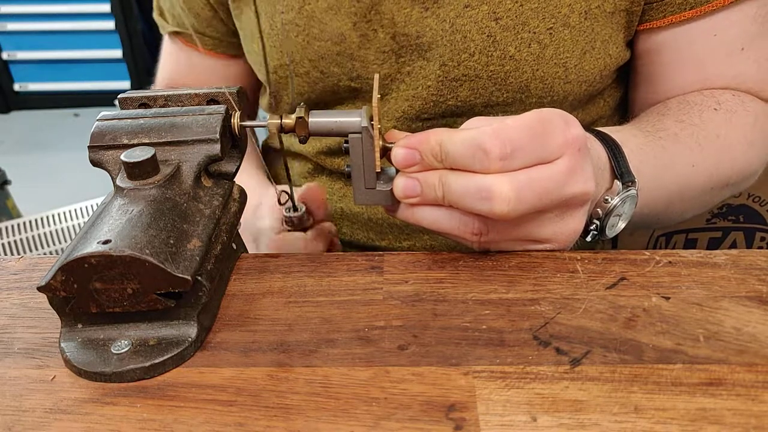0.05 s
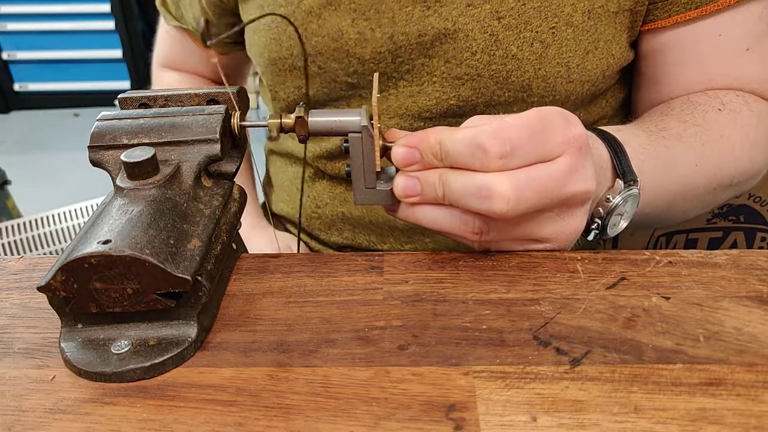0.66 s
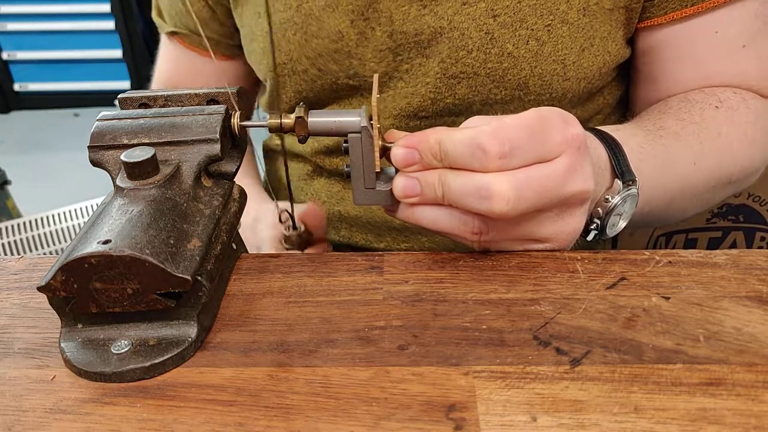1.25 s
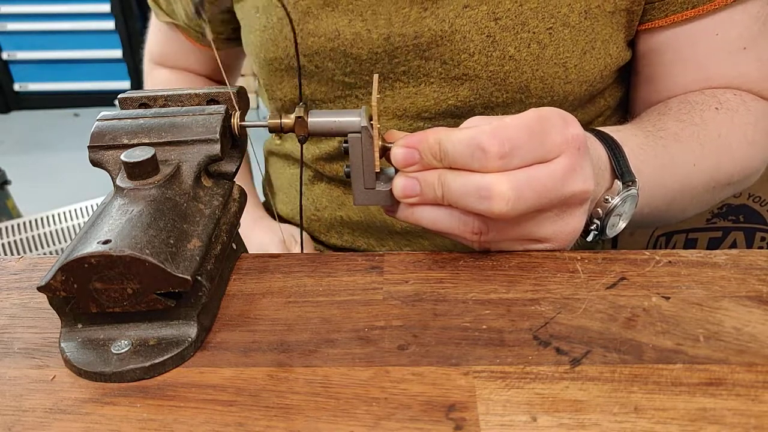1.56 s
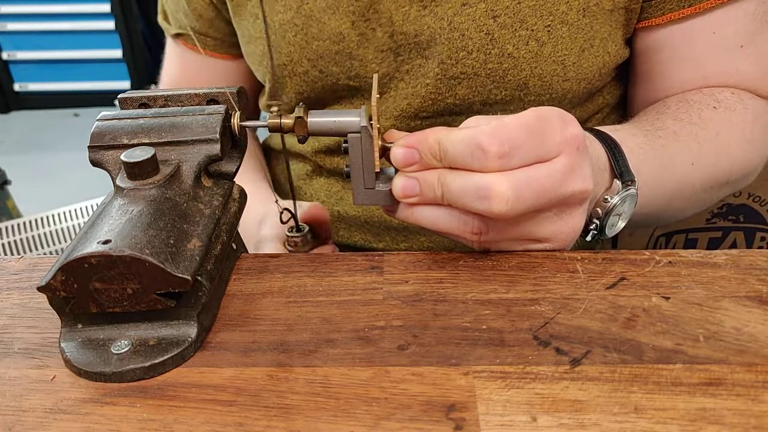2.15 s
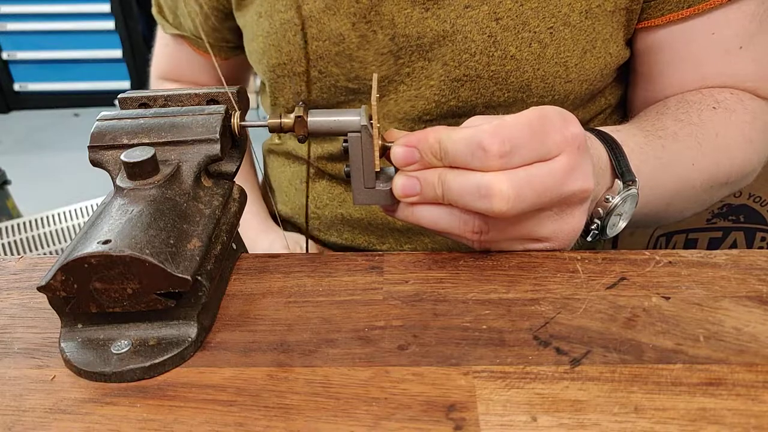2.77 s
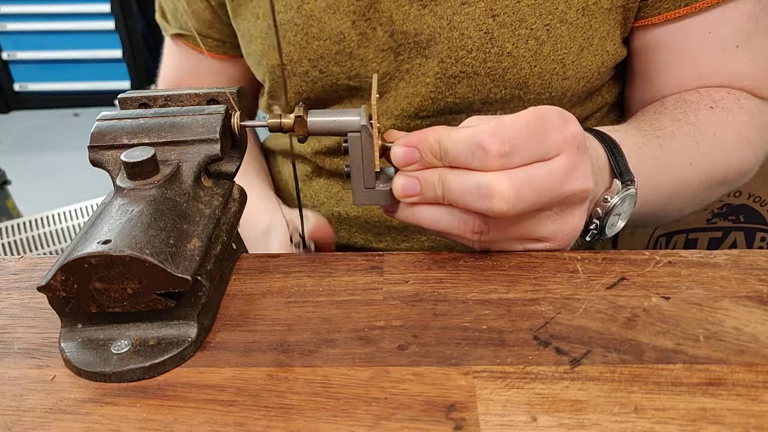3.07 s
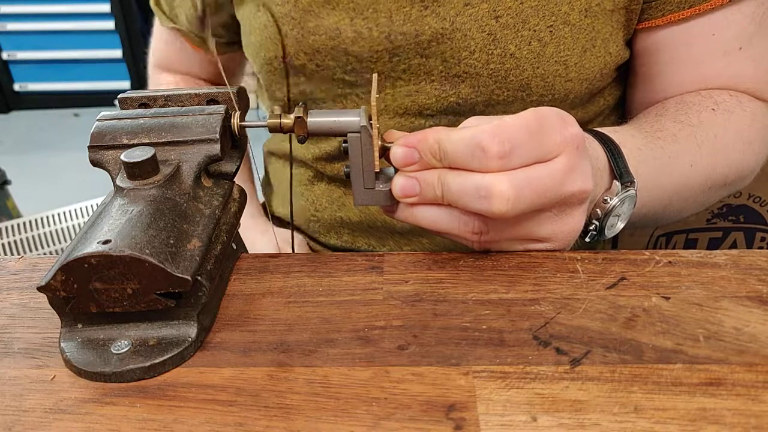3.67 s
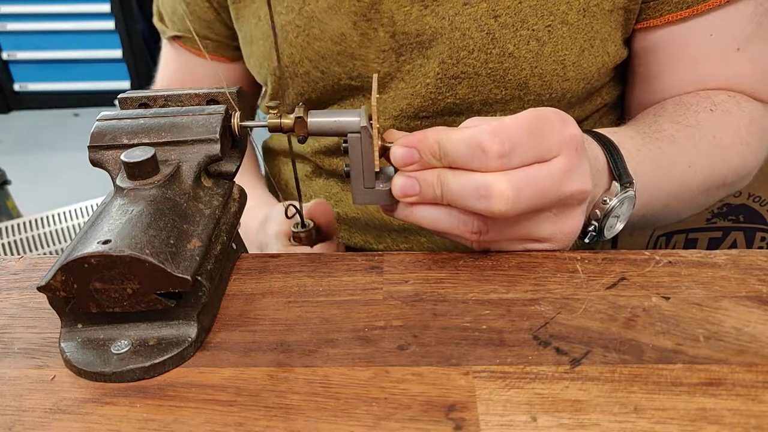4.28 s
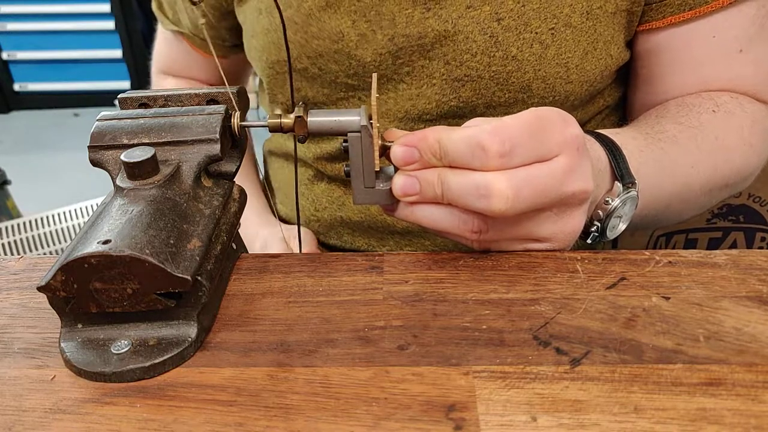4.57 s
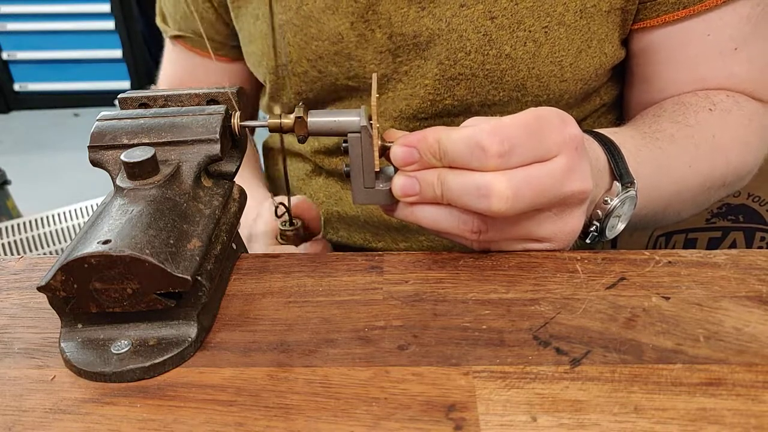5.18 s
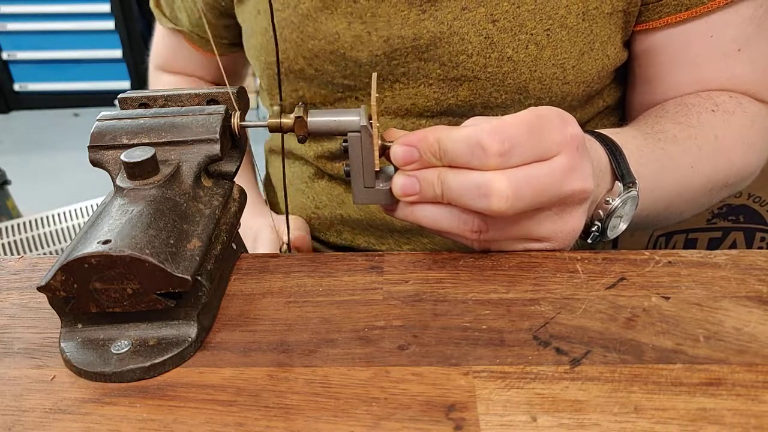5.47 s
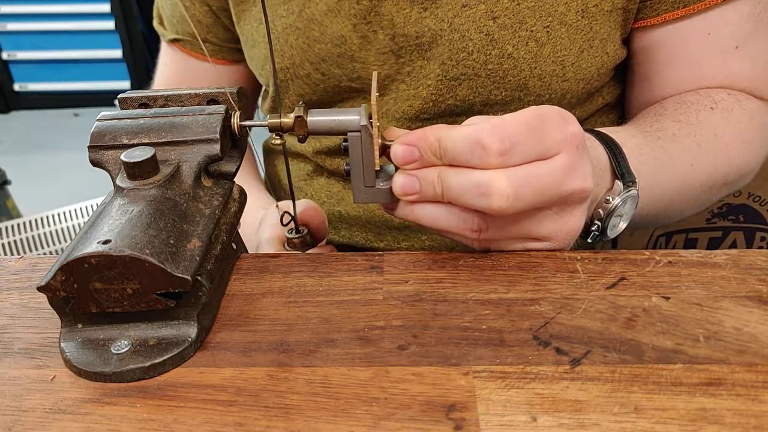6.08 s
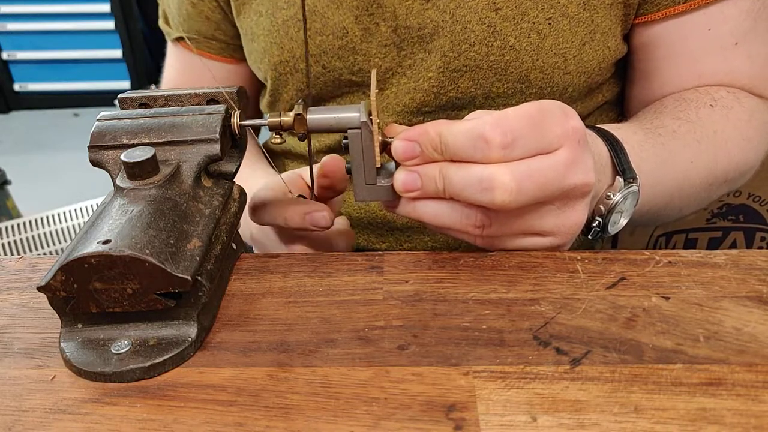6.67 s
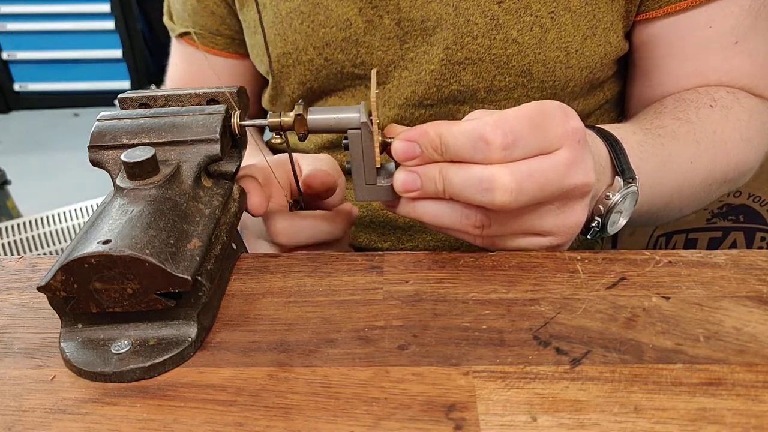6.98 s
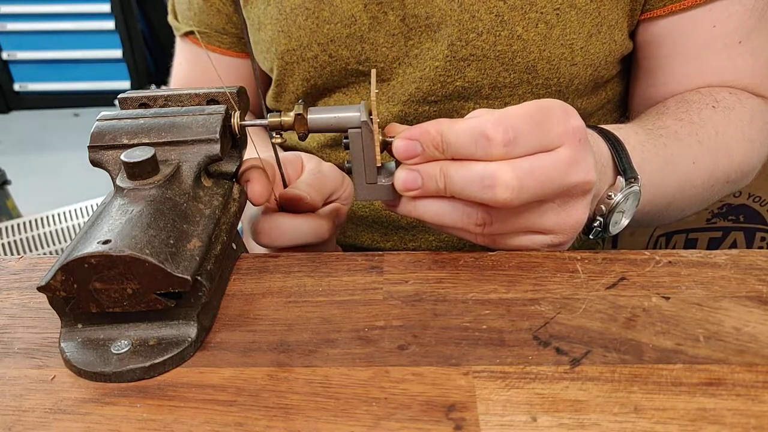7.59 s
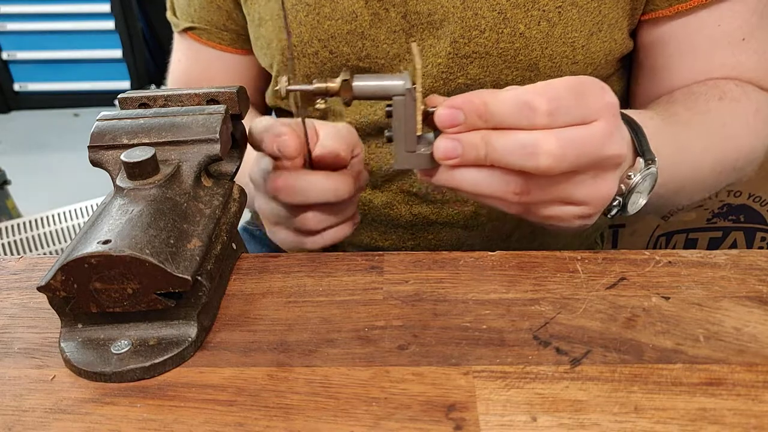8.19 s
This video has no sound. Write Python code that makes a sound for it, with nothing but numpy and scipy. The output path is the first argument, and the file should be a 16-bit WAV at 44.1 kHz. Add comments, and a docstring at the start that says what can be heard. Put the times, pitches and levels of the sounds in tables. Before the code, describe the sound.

A small bow drill bores into a brass plate, close up, in quick back-and-forth rasps with snapping chips and a low judder through a vice and wooden bench. The strokes grow lighter and the brass gives short, high squeaks. The drilling stops, leaving a quiet workshop with a low hum, a faint clock ticking across the room and a few soft knocks as the tool is lifted away.

```python
"""Bow drill on brass, close up

At a wooden workshop bench, a bow spins a small drill back and forth against a brass plate, its far end
pivoted in a vice. On every stroke the cutter judders through vice and bench, rasps and snaps off chips;
now and then the brass squeaks. When the bow stops, a clock is heard across the room over a faint hum,
and the tool is lifted away with a few soft knocks."""
import sys
import numpy as np
from scipy import signal
from scipy.fft import rfft, irfft
from scipy.io import wavfile
from scipy.ndimage import uniform_filter1d

SR = 44100
rng = np.random.default_rng(int(sys.argv[2]) if len(sys.argv) > 2 else 0)


def generate_wav(sig):
    """Save sig (samples, or channels by samples) to the path in sys.argv[1] as 16-bit PCM at SR."""
    pcm = np.round(np.clip(np.atleast_2d(sig).T, -1, 1) * 32767).astype(np.int16)
    wavfile.write(sys.argv[1], SR, pcm)


N = 367774
TIME = np.arange(N) / SR

# Workshop air. Each row: frequency in Hz, relative level in dB.
AIR_SPECTRUM = [(25, 1), (48, 2), (70, 2.5), (130, -9.5), (300, -18), (850, -23), (1450, -27), (1900, -28),
                (6000, -27.5), (7500, -31), (10000, -39.5), (15700, -34)]
# Machine hum in the room. Each row: frequency in Hz, level in dB.
HUM_TONES = [(48.4, -54), (75.4, -82.5), (100, -69.5)]
# Clock beats. Each row: time in seconds, relative level in dB, case tone in Hz.
CLOCK_BEATS = [(6.50, -66, 1200), (7.101, -61, 1620), (7.68, -65, 1170), (8.277, -61.5, 1630)]
# Fingers change grip. Each row: time in seconds, level in dB, half-width in seconds.
FINGER_RUBS = [(6.15, -66.5, 0.18), (6.75, -71.5, 0.3)]
# The tool bumps the vice, in the last strokes and as it is freed. Each row: time in seconds,
# relative bump level in dB, bench thud in dB, thud pitch in Hz, steel clink in dB.
TOOL_KNOCKS = [(4.173, -43.5, -29.5, 183, -52), (4.84, -39, -55, 181, -47), (5.493, -36, -54, 182.4, -33),
               (6.872, -46, -49, 70, -62), (7.015, -53, -49, 171, -58), (7.946, -41.5, -36.5, 173, -52)]
# A dull bump. Each row: frequency in Hz, relative level in dB.
BUMP_SPECTRUM = [(70, -18), (170, -9.5), (260, -9), (350, -8), (470, -18), (700, -9.5), (880, -10.5),
                 (1130, -22), (1400, -28), (4000, -82)]
# The pivot leaves its seat. Each row: time in seconds, relative level in dB, half-width in seconds.
PIVOT_SLIDES = [(8.12, -62.5, 0.0087), (8.155, -68, 0.028)]
# The sliding pivot's rub. Each row: frequency in Hz, relative level in dB.
SLIDE_SPECTRUM = [(150, -18), (450, 8), (1500, 5), (3000, -1), (6000, 6.5), (10000, -21)]
# Modes of bench, vice and plate. Each row: frequency in Hz, bandwidth in Hz, relative level in dB,
# left minus right in dB.
BENCH_MODES = [(77, 15.8, -10.5, -5), (105.6, 4.8, 3.5, 4), (150.3, 18.5, 4, 1.5), (185.2, 25.2, 0.5, 4),
               (201.6, 27, -4.5, 3.5), (243.9, 15.3, -9.5, 5)]
VICE_MODES = [(282, 29.5, -3, 8.1), (333.7, 13.3, 3.5, 5.6), (384.4, 26.8, 3.5, 1.2), (452, 74.5, -2, 2.2),
              (536, 26.6, -3.5, 0.84), (629.5, 22, -10, 18.4), (698.6, 13.6, -4, 18),
              (806.3, 32, -1.5, 1.2), (894.7, 26.6, -1.5, 1.9), (1059, 54, -10.5, 6), (1131, 30, -6, 2.7),
              (1310, 200, -12.5, 4.5), (1516, 62, -9, 5.4), (1924, 306, -19.5, 3), (2410, 74, -16, 4.2)]
PLATE_MODES = [(3676, 140, 7, 6), (4540, 290, 2.5, -11), (5440, 47, 7, 7), (6205, 100, 2, 19),
               (8150, 300, -8.5, -12), (8200, 88, 1.5, -16), (9640, 210, -17, -19)]
# How alike a mode is on the microphone's two sides. Each row: frequency in Hz, likeness from -1 to 1.
STEREO_LIKENESS = [(60, 0.86), (200, 1), (330, 1), (500, 0.57), (800, 0.78), (1200, -0.28), (2500, -0.2)]
# The cutter digs in and thumps the bench. Each row: start in seconds, relative level in dB, pitch in Hz.
DEEP_DIGS = [(0.015, -10.5, 143), (0.227, -7.5, 179), (0.282, -6, 154), (0.695, -9.5, 156),
             (1.054, -7.5, 167), (1.232, -7.5, 158), (1.465, -7.5, 142), (1.648, -5, 146),
             (1.719, -1, 159.7), (1.9, -6.5, 123), (2.937, -15, 151), (3.025, -8, 154.4), (3.402, -21, 147),
             (3.608, -10.5, 151), (3.746, -15, 163), (4.028, -10, 168), (5.442, -17, 161),
             (5.829, -12, 150)]
# The spindle rattles in the vice on hard strokes. Each row: time in seconds, level in dB.
SPINDLE_RATTLES = [(1.290, -38), (1.322, -27.5), (1.936, -31), (2.062, -26), (2.104, -33.5)]
# The bow lets off. Each row: time in seconds, relative level of the arbor's ring in dB.
BOW_RELEASES = [(2.512, -55.5), (4.181, -60), (5.98, -63)]
# The free steel arbor's beating pair of modes. Each row: frequency in Hz, relative level in dB.
FREE_ARBOR_MODES = [(5190, 4), (5281, 1)]
# The arbor pressed into the cut. Each row: frequency in Hz, bandwidth in Hz, gain in dB.
PRESSED_ARBOR_MODES = [(3870, 60, -9), (5270, 14, 1)]
# The edge chatters on the brass. Each row: time in seconds, relative level in dB, half-width in seconds,
# first pitch in Hz, last pitch in Hz, ring left in the plate in dB.
BRASS_SQUEAKS = [(3.781, -25, 0.003, 4150, 4290, -21), (3.867, -15.5, 0.0066, 5135, 3900, -24),
                 (4.097, -18, 0.003, 4000, 5330, -28), (4.587, -28, 0.0094, 4150, 4500, -28),
                 (4.659, -23, 0.0058, 3900, 4230, -28), (4.707, -22, 0.0025, 3900, 4820, -30),
                 (4.734, -38, 0.0025, 5600, 5800, -30), (4.768, -23.5, 0.003, 3800, 4020, -29),
                 (5.1, -26.5, 0.0036, 4500, 4730, -40), (5.653, -25.5, 0.011, 6000, 3920, -30),
                 (5.965, -30, 0.0079, 3800, 4250, -27)]
# The colour of that chatter. Each row: frequency in Hz, relative level in dB.
CHATTER_SPECTRUM = [(2000, -37.5), (3300, -18), (3950, -3.5), (4800, -5.5), (5700, -21.5), (7000, 1.5),
                    (8250, -2), (9500, -34), (16000, -35)]
# The edge catches and shrieks. Each row: time in seconds, pitch in Hz, relative level in dB.
EDGE_CATCHES = [(1.074, 5990, -29.5), (2.1382, 6060, -33.5), (3.787, 5760, -28), (5.4283, 5720, -26)]
# Big chips snap off the plate. Each row: time in seconds, relative level in dB, pitch in Hz.
BIG_CHIPS = [(0.0151, -17, 6100), (0.0302, -25, 5700), (0.0499, -33, 5560), (0.2447, -25, 6160),
             (0.2758, -24, 5700), (0.3945, -26.5, 6200), (0.4375, -22, 6200), (0.4766, -21, 5600),
             (0.5109, -21, 5910), (0.6948, -21.5, 5230), (0.8351, -20, 5700), (0.8432, -18.5, 5900),
             (0.8607, -21, 6000), (0.8974, -16.5, 6360), (1.072, -16.5, 5730), (1.2213, -21.5, 5630),
             (1.261, -18, 5640), (1.315, -18.5, 6200), (1.483, -15.5, 4750), (1.5249, -16.5, 6250),
             (1.5523, -17, 5740), (1.6574, -14.5, 6200), (1.6754, -19, 6300), (1.684, -22, 5900),
             (1.709, -15, 5950), (1.7288, -16.5, 6340), (1.8624, -16.5, 5500), (1.888, -15, 6140),
             (1.939, -23, 5660), (2.0515, -26, 5570), (2.0725, -20, 5230), (2.1001, -13, 5710),
             (2.1494, -13, 5950), (2.2538, -26.5, 5900), (2.325, -21, 6100), (2.364, -22.5, 5660),
             (2.4786, -27, 5500), (2.4992, -15, 5270), (2.7188, -25, 5830), (2.802, -18.5, 6100),
             (2.9353, -26, 6200), (2.9722, -19.5, 6100), (3.007, -24, 5500), (3.1036, -25, 5960),
             (3.211, -22, 5750), (3.358, -20.5, 5700), (3.3892, -30, 5850), (3.404, -23, 5530),
             (3.5668, -23, 5200), (4.7239, -18, 6100), (4.7363, -21, 5750), (5.1161, -17.5, 6130),
             (5.132, -23, 5700), (5.5407, -23.5, 5750), (5.5834, -24.5, 5950), (5.6057, -26.5, 5660),
             (5.6443, -20.5, 6470)]
# Thin spits of splinters, high above the rasp. Each row: time in seconds, relative level in dB.
SPLINTER_SPITS = [(0.016, -40), (0.844, -44), (1.074, -44), (1.298, -45), (1.315, -45), (1.865, -46),
                  (3.360, -44), (3.392, -44), (3.426, -46), (3.766, -47), (3.786, -42), (3.866, -39),
                  (3.981, -43), (4.003, -43), (4.077, -43), (4.099, -42), (4.492, -41), (4.961, -39),
                  (5.118, -46), (5.430, -46), (5.610, -50), (5.646, -39)]
# The highest modes, rung by splinters. Each row: frequency in Hz, bandwidth in Hz, relative level in dB.
SIZZLE_MODES = [(11030, 270, -7.5), (12800, 880, -8), (14200, 900, -6), (15600, 500, -1)]
# The scraping edge's colour. Each row: frequency in Hz, relative levels left and right in dB.
EDGE_SPECTRUM = [(510, -60, -70), (2100, -23, -2.5), (2850, -17.5, -4), (3480, -17, -2), (3780, -1.5, 4.5),
                 (4250, -5, -0.5), (5250, -7, 5), (5650, 4.5, -9), (6040, 0.5, 7.5), (6760, -12, -4.5),
                 (8170, -17, 4.5), (9010, -31, -6), (10300, -69, -49), (13200, -44, -45), (15400, -41, -27)]
# Pushes and pulls of the bow. Each row: start and end in seconds, then relative levels in dB of
# bench thrum, vice grind and rasp.
BOW_STROKES = [(0.008, 0.112, -17, -28, -30), (0.184, 0.347, -22.5, -33, -36.5),
               (0.395, 0.524, -19.5, -30.5, -34), (0.616, 0.76, -21.5, -34.5, -38),
               (0.807, 0.915, -19.5, -30, -32), (1.024, 1.155, -21, -33.5, -38.5),
               (1.227, 1.355, -17.5, -27.5, -31.5), (1.437, 1.579, -18, -29.5, -31.5),
               (1.628, 1.759, -19.5, -27.5, -32.5), (1.847, 1.988, -20.5, -28.5, -30),
               (2.046, 2.167, -16.5, -27, -31.5), (2.26, 2.404, -19, -30.5, -33),
               (2.475, 2.503, -16, -30, -36), (2.717, 2.866, -22, -31.5, -34),
               (2.927, 3.033, -17, -29.5, -34), (3.111, 3.272, -22.5, -30.5, -31.5),
               (3.336, 3.466, -21.5, -31, -31), (3.548, 3.685, -23.5, -33.5, -34.5),
               (3.748, 3.89, -24, -35, -33.5), (3.975, 4.113, -28.5, -38, -37),
               (4.17, 4.182, -39, -43.5, -35.5), (4.442, 4.594, -30, -42.5, -40.5),
               (4.678, 4.805, -29.5, -40, -33), (4.908, 5.036, -29, -40, -38.5),
               (5.095, 5.218, -28.5, -35, -36.5), (5.325, 5.471, -29, -39.5, -39),
               (5.53, 5.67, -31.5, -40.5, -42), (5.753, 5.932, -30.5, -41.5, -41)]


def from_db(db):
    """Decibels to gain."""
    return 10 ** (np.asarray(db) / 20)


def unit_power(x):
    """Scale to unit power."""
    return x / np.sqrt(np.mean(x ** 2) + 1e-20)


def pan(db):
    """Gains at the microphone for a level difference, left minus right."""
    return from_db(np.array([[db], [-db]]) / 2)


def drift(per_s):
    """Smooth random wandering with a spread of about 1."""
    knots = rng.standard_normal(2 ** 15)
    return np.interp(TIME * per_s, np.arange(len(knots)), knots)


def steady(x, span_s):
    """Unit power over every short span."""
    power = uniform_filter1d(np.mean(x ** 2, axis=0), max(int(span_s * SR), 2))
    return x / np.sqrt(np.abs(power) + 1e-20)


def colour(x, spectrum, size=8192):
    """Minimum-phase filter of unit power gain that follows a spectrum."""
    hz, db = np.transpose(spectrum)
    grid = np.maximum(np.fft.rfftfreq(size, 1 / SR), 1)
    cepstrum = irfft(np.log(from_db(np.interp(np.log(grid), np.log(hz), db))))
    cepstrum[1:size // 2] *= 2
    cepstrum[size // 2 + 1:] = 0
    response = irfft(np.exp(rfft(cepstrum)))
    return signal.oaconvolve(x, response / np.linalg.norm(response))[:N]


def resonance(x, hz, width):
    """Two-pole resonance with gain 1 at its peak and a width in Hz."""
    r = np.exp(-np.pi * width / SR)
    poles = [1, -2 * r * np.cos(2 * np.pi * hz / SR), r * r]
    return signal.lfilter(np.array([1, 0, -1]) * (1 - r * r) / 2, poles, x + 1e-18)


def body(force, modes):
    """Two forces ring a set of modes; the high modes are less alike left and right than the low."""
    out = np.zeros((2, N))
    for k, (hz, width, db, side_db) in enumerate(modes):
        alike = np.clip(np.interp(hz, *np.transpose(STEREO_LIKENESS)), -1, 1)
        drive = np.sqrt(1 + alike) * force[0] + np.sqrt(1 - alike) * force[1] * [[1], [-1]]
        out += (-1) ** k * from_db(db) * pan(side_db) * resonance(drive, hz, width)
    power_gain = sum(from_db(2 * db) * 2 * np.pi * width / SR for _, width, db, _ in modes)
    return out / np.sqrt(power_gain)


def grains(per_s, spread_db):
    """Two trains of tiny fractures of uneven size."""
    sizes = from_db(spread_db * np.minimum(rng.exponential(1, (2, N)), 4))
    return unit_power(sizes * rng.choice([-1, 1], (2, N)) * (rng.random((2, N)) < per_s / SR))


def fade(clicks, decay_s):
    """Give each click an exponential tail."""
    return signal.lfilter([1], [1, -np.exp(-1 / (decay_s * SR))], clicks + 1e-18)


def blows(rows, crumble, crumble_s):
    """A click and a brief crumbling for each time in seconds and level in dB."""
    clicks = np.zeros(N)
    for s, db in rows:
        clicks[round(s * SR)] = from_db(db)
    return clicks * [[1], [0]] + crumble * fade(clicks, crumble_s) * rng.standard_normal((2, N))


def swells(rows):
    """A bell-shaped envelope for each time in seconds, level in dB and half-width in seconds."""
    out = np.zeros(N)
    for s, db, half in rows:
        near = slice(*np.searchsorted(TIME, [s - 10 * half, s + 10 * half]))
        out[near] += from_db(db) * np.exp(-((TIME[near] - s) / half) ** 2 / 2)
    return out


def struck(rows, rise_s, decay_s):
    """A swelling, dying sine for each start in seconds, level in dB and pitch in Hz."""
    out = np.zeros(N)
    for s, db, hz in rows:
        start = round(s * SR)
        t = TIME[:min(N - start, int(10 * decay_s * SR))]
        envelope = from_db(db) * (1 - np.exp(-t / rise_s)) * np.exp(-t / decay_s)
        out[start:start + len(t)] += envelope * np.sin(2 * np.pi * hz * t)
    return out


def echoes(x, t60, delay_s):
    """Diffuse reflections of unit power gain, different on each side of the microphone."""
    t = TIME[:min(int(t60 * SR), SR)]
    tail = rng.standard_normal((2, SR))[:, :len(t)] * from_db(-60 * t / t60) * (t > delay_s)
    return signal.oaconvolve(x, tail / np.linalg.norm(tail, axis=1, keepdims=True), axes=1)[:, :N]


def room_tone():
    """Quiet workshop air all round the microphone, and a wavering low machine hum."""
    mid, side = rng.standard_normal((2, N))
    side = signal.sosfilt(signal.butter(1, 400, "high", fs=SR, output="sos"), side)
    air = np.array([colour(mid + side, AIR_SPECTRUM), colour(mid - side, AIR_SPECTRUM)])
    hum = 0
    for hz, db in HUM_TONES:
        amplitude = from_db(db + 0.79 * drift(5.8)) * np.sqrt(2)
        hum += amplitude * np.sin(2 * np.pi * hz * TIME + 3.9 * drift(6.0))
    return (from_db(-56.5) * air + hum) * pan(0.92)


def clock():
    """A clock across the room: tick and tock differ in case tone and arrive as reverberation."""
    beats = 0
    for s, db, hz in CLOCK_BEATS:
        escapement = swells([(s + 0.0035, db, .007)]) * rng.standard_normal((2, N))
        click = .5 * resonance(escapement, 4560, 450) - 1.28 * resonance(escapement, 5900, 740)
        beats += 1.66 * resonance(escapement, hz, 120) + click
    return from_db(23.0) * echoes(beats, t60=0.52, delay_s=0.00042)


def grips():
    """Skin rubs softly on the tool."""
    return swells(FINGER_RUBS) * unit_power(resonance(rng.standard_normal((2, N)), 1450, 220))


def handling():
    """The tool bumps the vice, the bench thuds and the pivot slides free, with some room behind them."""
    touches = blows([(s, db) for s, db, *_ in TOOL_KNOCKS], crumble=0.24, crumble_s=0.0089)
    clinks = blows([(s, db) for s, *_, db in TOOL_KNOCKS], crumble=0.32, crumble_s=0.0091)
    bumps = from_db(12.5) * colour(touches[0], BUMP_SPECTRUM) + edge(clinks)
    thuds = struck([(s, db, hz) for s, _, db, hz, _ in TOOL_KNOCKS], rise_s=0.0026, decay_s=0.019)
    friction = swells(PIVOT_SLIDES) * grains(per_s=1100, spread_db=1.0)[0]
    direct = (bumps + thuds + from_db(4.5) * colour(friction, SLIDE_SPECTRUM)) * pan(3.0)
    return direct + from_db(-1.0) * echoes(direct, t60=0.35, delay_s=0.012)


def sway(thrum):
    """The whole bench rumbles for as long as the arm is working, and its top drones on a little."""
    working = np.tanh(from_db(44.0) * thrum)
    rumble = unit_power(resonance(resonance(rng.standard_normal(N), 40, 37), 44, 47))
    drone = unit_power(resonance(working * rng.standard_normal(N), 98.7, 8.4))
    return (from_db(-45.0) * working * rumble + from_db(-43.5) * drone) * pan(1.7)


def thumps():
    """A deep dig swings the bench for a few firm cycles."""
    return from_db(-3.5) * struck(DEEP_DIGS, rise_s=0.0041, decay_s=0.018) * pan(3.7)


def rattles(half_s=0.0054, above_hz=650):
    """A burst of loose contacts rings the upper modes of the vice."""
    shaking = swells([(s, db, half_s) for s, db in SPINDLE_RATTLES]) * rng.standard_normal((2, N))
    return body(shaking, [mode for mode in VICE_MODES if mode[0] > above_hz])


def judder(bite, thrum, grind, snaps, top_hz=4700):
    """The uneven bite and each snapping chip shake the heavy vice and the bench, which pass few highs."""
    force = grains(per_s=900, spread_db=1.5) * from_db(2.0 * bite)
    jolts = blows(snaps, crumble=0.0068, crumble_s=0.0052)
    bench = steady(body(force + from_db(40.0) * jolts, BENCH_MODES), span_s=0.0325)
    bench *= from_db(-4.0 + 2.23 * drift(35)) * thrum
    vice = steady(body(force + from_db(38.5) * jolts, VICE_MODES), span_s=0.033)
    vice *= from_db(-1.03 + 1.22 * drift(45)) * grind
    bench, vice = signal.sosfilt(signal.butter(2, top_hz, fs=SR, output="sos"), [bench, vice])
    vice_room = from_db(-8.0) * echoes(vice, t60=0.56, delay_s=0.011)
    bench_room = from_db(-19.5) * echoes(bench, t60=0.41, delay_s=0.017)
    return bench + vice + vice_room + bench_room


def free_ring():
    """With the bow's pressure off, the steel arbor sings on."""
    rows = [(s, db + mode_db, hz) for s, db in BOW_RELEASES for hz, mode_db in FREE_ARBOR_MODES]
    return struck(rows, rise_s=.01, decay_s=0.085) * pan(13)


def singing(hz=8240, lead_s=.003):
    """Each squeak leaves a clear note in a high mode of the plate, right of the microphone."""
    rows = [(s - lead_s, ring_db, hz) for s, *_, ring_db in BRASS_SQUEAKS]
    return struck(rows, rise_s=0.0037, decay_s=0.0059) * pan(-19.5)


def catches():
    """A caught edge swings up and dies within a couple of milliseconds, as one clear note on the left."""
    shrieks = sum(swells([(s, db, .0006)]) * np.sin(2 * np.pi * hz * TIME) for s, hz, db in EDGE_CATCHES)
    return from_db(9.0) * shrieks * pan(22.2)


def squeal():
    """Rough stick-slip whose pitch glides through each squeak."""
    glide = []
    for s, _, half, first_hz, last_hz, _ in BRASS_SQUEAKS:
        glide += [(s - half, first_hz), (s + half, last_hz)]
    hz = np.interp(TIME, *np.transpose(sorted(glide)))
    phase = 2 * np.pi * np.cumsum(hz * (1 + 0.07 * drift(1500))) / SR
    return from_db(-6.5) * np.sin(phase) * [[1], [0]] + from_db(-8) * rng.standard_normal((2, N))


def sizzle(splinters):
    """The finest splinters favour now one high mode, now another."""
    modes = 0
    for hz, width, db in SIZZLE_MODES:
        modes += from_db(db + 5.7 * drift(60)) * resonance(resonance(splinters, hz, width), hz, width)
    return from_db(10) * modes * pan(-11.5)


def nicks(rasp, per_s=60, spread_db=2, centre_hz=5200, spread_octaves=.17):
    """The edge skips on the brass in tiny ticks, each at its own pitch, that coarsen the rasp."""
    at = np.flatnonzero(rng.random(N) < per_s / SR)
    size, pitch = np.clip(rng.standard_normal((len(at), 2)), -2, 2).T
    db = 20 * np.log10(rasp[at] + 1e-9) + 6.5 + spread_db * size
    hz = centre_hz * 2 ** (spread_octaves * pitch)
    return struck(zip(TIME[at], db, hz), rise_s=.0001, decay_s=.0007) * pan(10)


def pings():
    """Each big chip rings the edge briefly at a pitch of its own."""
    return from_db(-7) * struck(BIG_CHIPS, rise_s=0.0002, decay_s=0.0021) * pan(14)


def chipping(rasp, flakes_per_s=50, spread_db=7):
    """Times and levels of the big chips, and of random flakes, stronger the harder the edge cuts."""
    at = np.flatnonzero((rng.random(N) < flakes_per_s / SR) & (rasp > 0))
    flake_db = 20 * np.log10(rasp[at]) + 2.5 - spread_db * rng.standard_normal(N)[at]
    return [(s, db) for s, db, _ in BIG_CHIPS] + list(zip(TIME[at], flake_db))


def bowing(levels_db, lead_s, lag_s, bite_s, coast_s, arch, idle_db, idle_s):
    """Gain of the strokes: each bites, arches with the bow's speed, coasts and leaves a dying rub."""
    power = np.zeros(N)
    for (start, end, *_), db in zip(BOW_STROKES, levels_db):
        length = end - start + lead_s + lag_s
        span = slice(*np.searchsorted(TIME, [start - lead_s, end + 1]))
        t = TIME[span] - (start - lead_s)
        speed = np.sin(np.pi * np.minimum(t / length, 1))
        after = np.maximum(t - length, 0)
        cut = (1 + arch * speed) / (1 + arch) * np.exp(-after / coast_s)
        rub = from_db(idle_db) * np.exp(-after / idle_s)
        power[span] += (from_db(db) * (cut + rub) * (1 - np.exp(-t / bite_s))) ** 2
    return np.sqrt(power)


def stroke_gains():
    """Thrum, grind and rasp: the heavier the part, the earlier it feels the bow and the longer it shakes."""
    _, ends, thrum_db, grind_db, rasp_db = np.transpose(BOW_STROKES)
    thrum = bowing(thrum_db, lead_s=0.021, lag_s=0.042, bite_s=0.0047, coast_s=0.025,
                   arch=3.2, idle_db=-11.0, idle_s=0.14)
    grind = bowing(grind_db, lead_s=0.017, lag_s=0.016, bite_s=0.0013, coast_s=0.0069,
                   arch=13.0, idle_db=-14.0, idle_s=0.091)
    rasp = bowing(rasp_db, lead_s=0.013, lag_s=0.0011, bite_s=0.0011, coast_s=0.0037,
                  arch=4.6, idle_db=-34.0, idle_s=0.089)
    # the spindle knocks in its play as the bow turns round
    backlash = swells([(end + 0.037, db - 6.5, 0.0027) for end, db in zip(ends, grind_db)])
    return thrum, np.hypot(grind, backlash), rasp


def edge(force):
    """The bright voice of the steel cutter, coloured differently on each side of the microphone."""
    hz, left_db, right_db = np.transpose(EDGE_SPECTRUM)
    left = colour(force[0] + force[1], np.c_[hz, left_db])
    right = colour(force[0] - force[1], np.c_[hz, right_db])
    return np.array([left, right]) * pan(5.5)


def moving_contact(force, depth=.9):
    """Peaks and dips come and go in the rasp as the contact moves round the hole."""
    centres_hz = np.geomspace(3700, 8400, 8)
    return force + sum(depth * drift(35) * resonance(force, hz, width=450) for hz in centres_hz)


def fracturing(bite, digs_per_s=110):
    """Brass breaks in clumps: each small dig of the edge starts abruptly and crumbles away."""
    digs = (rng.random(N) < digs_per_s / SR) * rng.uniform(0.15, 1.0, N)
    cracks = grains(per_s=6000, spread_db=1.5) * from_db(2.0 * bite + 1.9 * drift(600))
    return steady(cracks * (0.44 + fade(digs, decay_s=0.0017)), span_s=0.041)


def cutting(bite, rasp, snaps, ring_db_per_s=0.7):
    """Close up, fractures, chips and squeaks ring edge, arbor and plate; returns that and the sizzle."""
    fractures = fracturing(bite)
    scrape = from_db(-8.5) * rasp * moving_contact(fractures)
    chips = blows(snaps, crumble=0.29, crumble_s=0.003)
    scraping = scrape + chips
    squeaking = swells([(s, db, half) for s, db, half, *_ in BRASS_SQUEAKS])
    chatter = from_db(-3.5) * squeaking * squeal()
    squeaks = np.array([colour(chatter[0] + side * chatter[1], CHATTER_SPECTRUM) for side in (1, -1)])
    cutter = edge(scraping + from_db(-6.5) * chatter) + from_db(-13.5) * squeaks * pan(12.4)
    arbor = sum(from_db(db) * resonance(scraping, hz, width) for hz, width, db in PRESSED_ARBOR_MODES)
    # the plate rings more as the hole deepens
    ringing = from_db(-17 + ring_db_per_s * TIME) * rasp * fractures
    plate = body(ringing + from_db(-8.0) * chips + .5 * chatter, PLATE_MODES)
    spits = swells([(s, db, 0.0028) for s, db in SPLINTER_SPITS]) * rng.standard_normal((2, N))
    splinters = from_db(-22) * chips + spits + from_db(-25) * squeaking * fractures
    splinters += from_db(-6.5 + 2.1 * drift(50)) * ringing
    return cutter + arbor * pan(3) + plate, sizzle(splinters)


def scene():
    """One uneven bite drives judder and rasp; the metal carries into the room, the sizzle dies close by."""
    bite = drift(110)
    thrum, grind, rasp = stroke_gains()
    snaps = chipping(rasp)
    cut, splinters = cutting(bite, rasp, snaps)
    metal = cut + pings() + nicks(rasp)
    notes = singing() + catches()
    bench_top = from_db(-7) * echoes(metal + splinters, t60=0.062, delay_s=0.00051)
    workshop = from_db(-8.0) * echoes(metal + .5 * notes, t60=0.65, delay_s=0.0079)
    shaking = judder(bite, thrum, grind, snaps) + rattles() + thumps() + sway(thrum)
    drill = shaking + metal + notes + splinters + free_ring()
    return drill + bench_top + workshop + handling() + grips() + clock() + room_tone()


def record(dry, low_cut_hz=36, high_cut_hz=16000):
    """The microphone loses the deepest bass, and the top is cut steeply."""
    thinned = signal.sosfilt(signal.butter(2, low_cut_hz, "high", fs=SR, output="sos"), dry)
    return signal.sosfilt(signal.ellip(10, .1, 80, high_cut_hz, fs=SR, output="sos"), thinned)


dry = scene()
out = record(dry)
generate_wav(out)
```